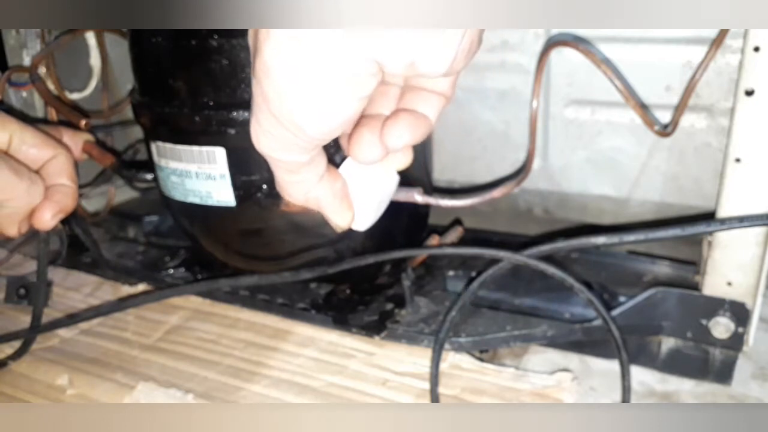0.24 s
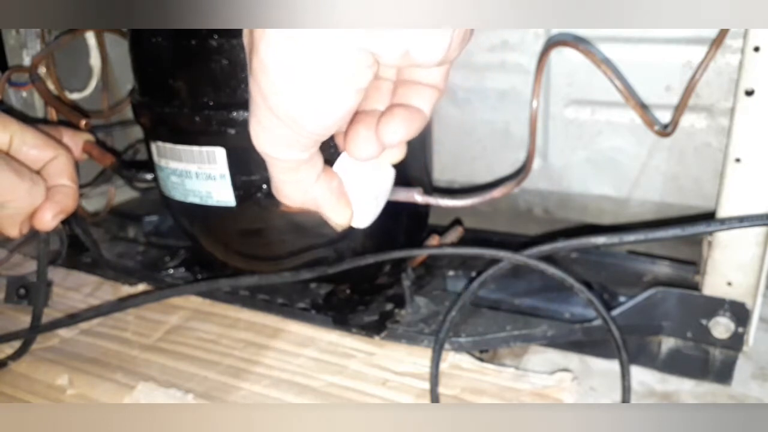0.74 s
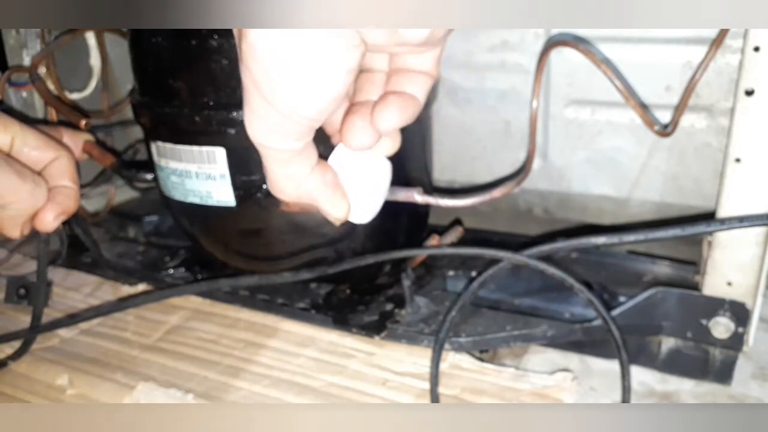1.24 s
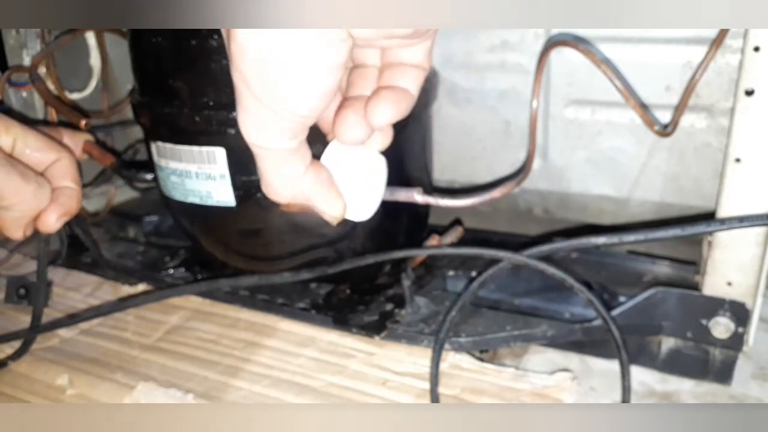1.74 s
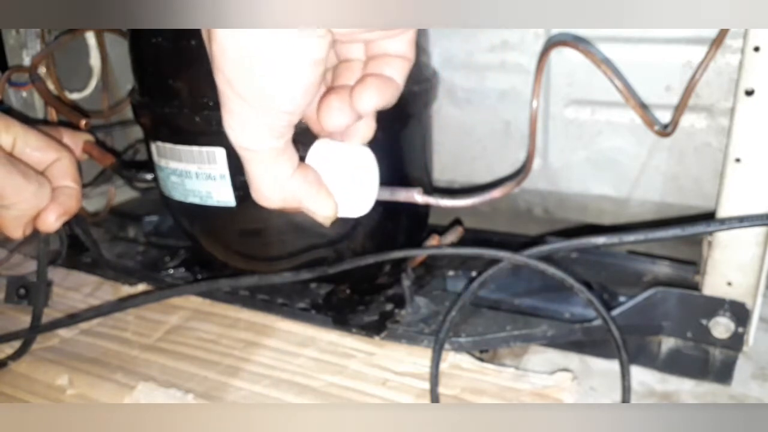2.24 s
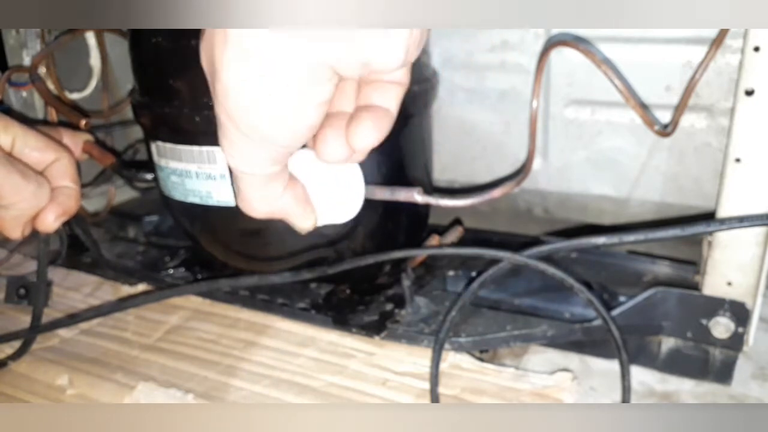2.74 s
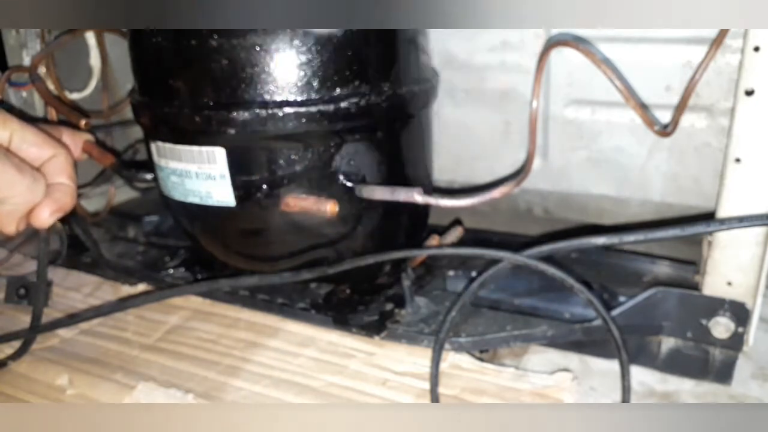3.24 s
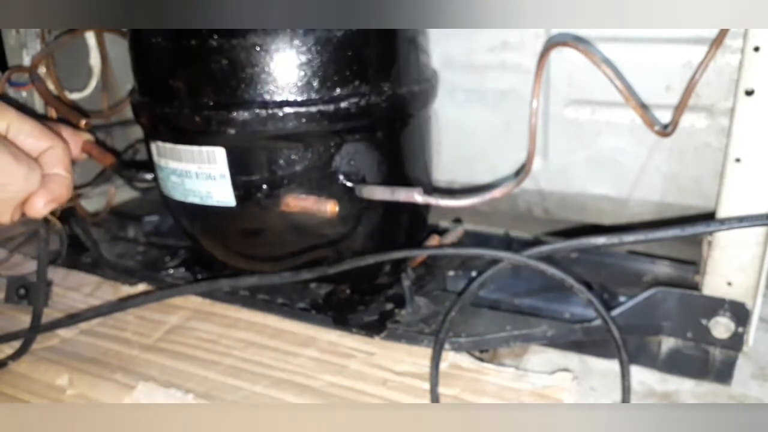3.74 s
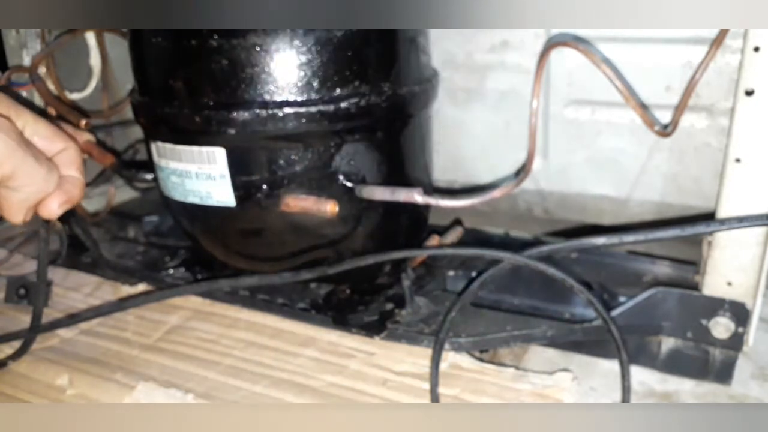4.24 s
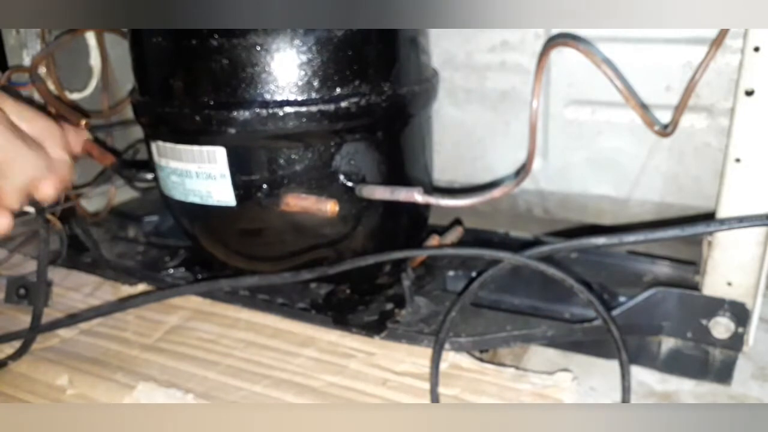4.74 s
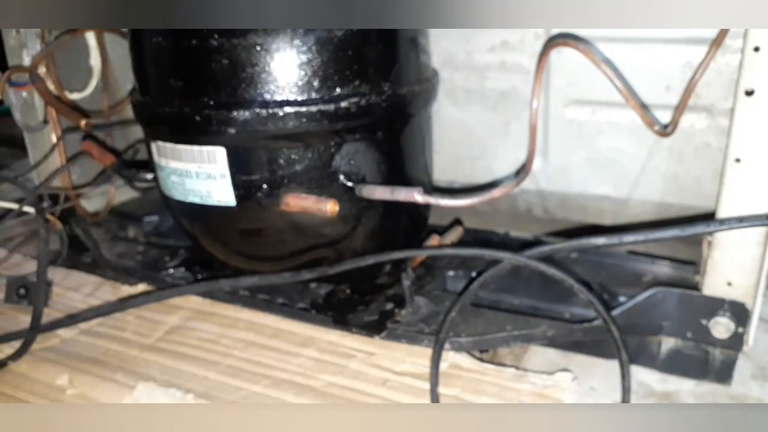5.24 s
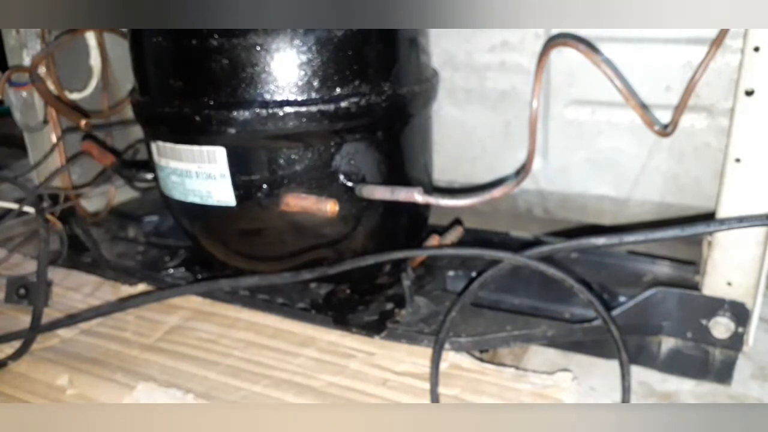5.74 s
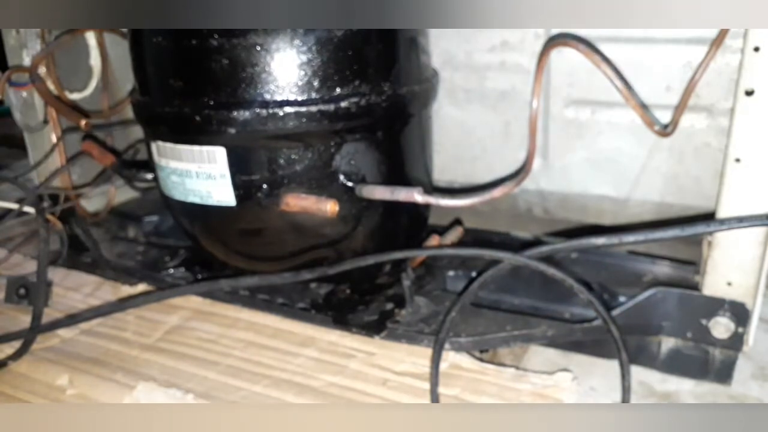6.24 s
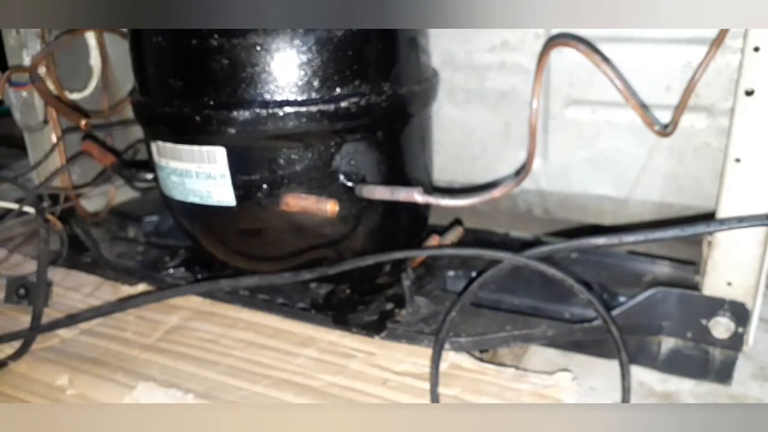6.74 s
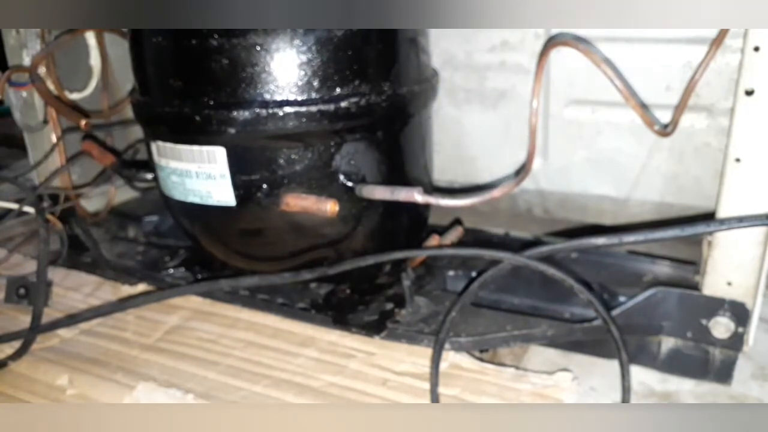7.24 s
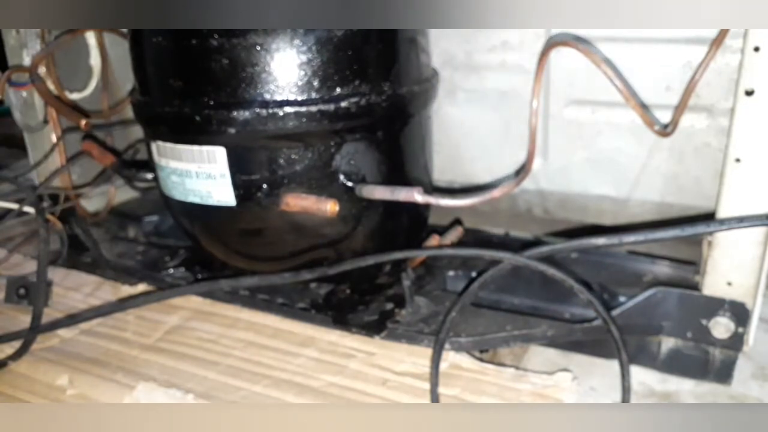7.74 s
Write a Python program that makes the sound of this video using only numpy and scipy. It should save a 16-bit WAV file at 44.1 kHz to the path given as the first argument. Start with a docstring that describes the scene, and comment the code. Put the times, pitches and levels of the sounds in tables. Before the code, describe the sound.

A refrigerator compressor runs close to the microphone with its tube open: a loud, constant bright hiss, a fast metallic valve buzz and a quieter low hum. Near three seconds a plastic cap gives tiny clicks and the hiss brightens slightly. Just before five seconds wiring rustles faintly and the hum grows fuller. A few dull bumps come near the end, over faint workshop machine drone and rumble.

```python
"""Open refrigerator compressor in a workshop

A compressor runs close by with its service tube open: turbulent air hisses through resonances of tube and
shell, a valve strikes the shell once a turn, and the motor hums as sines at multiples of the crank rate.
A hand takes a plastic cap away and another lets go of the wiring; hiss and hum come clear in two steps.
Cap, wiring and a few dull bumps near the end are pushes that ring damped modes.
Behind them other machines drone as steady tones over a noise rumble that swells now and then."""
import sys
import numpy as np
from scipy import signal
from scipy.fft import rfft, irfft, next_fast_len
from scipy.io import wavfile

SR = 44100
rng = np.random.default_rng(int(sys.argv[2]) if len(sys.argv) > 2 else 0)


def generate_wav(sig):
    """Save sig (samples, or channels by samples) to the path in sys.argv[1] as 16-bit PCM at SR."""
    pcm = np.round(np.clip(np.atleast_2d(sig).T, -1, 1) * 32767).astype(np.int16)
    wavfile.write(sys.argv[1], SR, pcm)


N = 352359
TIME = np.arange(N) / SR   # s
SIZE = next_fast_len(N)
FREQ = np.maximum(np.arange(SIZE // 2 + 1) * SR / SIZE, 1)   # Hz, kept above zero for division and logarithm

# resonances of tube and shell that colour the hiss: (frequency [Hz], nominal width [Hz], relative level [dB])
HISS_MODES = [(2296, 1610, -21.1), (2359, 242, -9.1), (2576, 756, -18.9), (3047, 809, -11.8),
              (3481, 305, -9.4), (3820, 344, -1.8), (4072, 390, -3.9), (4215, 146, -4.4), (4732, 964, -7.4),
              (5037, 313, -2.3), (5334, 583, -3.6), (5771, 464, -4.6), (6016, 233, -8.2),
              (6434, 863, -11.2), (6855, 327, -6.1), (7130, 509, -4.6), (7465, 226, -4.5),
              (7865, 916, -10.7), (8269, 361, -3.6), (8732, 752, -8.8), (9077, 314, -5.0),
              (9673, 1386, -8.9), (10638, 518, -3.3), (11053, 1034, -6.3), (11895, 769, -5.9),
              (12638, 1196, -7.4), (13443, 1800, -11.8), (14213, 287, -4.1), (14588, 668, -9.5),
              (15156, 1120, -8.5)]
# short echo paths off hands, shell and cabinet:
# (delay [ms], signed strength behind the hands [ratio], signed strength in the clear [ratio])
ECHO_PATHS = [(.276, .01, .09), (.548, -.08, .01), (.84, .05, -.09), (.994, .01, .11), (1.114, -.07, .05),
              (2.42, -.08, -.02), (2.724, .04, .12), (4.97, -.07, -.06), (5.4, -.05, -.05),
              (5.578, -.03, -.07)]
# shell modes struck by the valve: (frequency [Hz], nominal width [Hz], relative level [dB])
VALVE_MODES = [(1426, 110, -18), (2315, 108, -13), (2719, 70, -5), (2900, 70, -6), (2952, 205, -4),
               (3400, 150, -10), (3760, 200, -13), (4700, 70, -2.5), (5214, 70, 0.5), (5305, 94, 0),
               (5340, 264, 0), (5717, 300, -9), (6005, 100, 0), (6650, 250, -12), (7460, 120, -18)]
# brief fades of the shell's bright ring: (time [s], length [s], depth [dB])
RING_DIPS = [(4.6, .08, 4), (6.29, .11, 12)]
# motor hum: (multiple of the crank rate [ratio], relative level [dB])
HUM_ORDERS = [(1, -10), (2, 0.5), (3, -4), (8, -12.5)]
# hands that shield and damp the compressor, first at the cap, then at the wiring:
# (time of leaving [s], duration of the move [s], share of the shielding [0-1], damping of the hum [dB])
HANDS = [(3.22, 0.2, 1, 1), (4.77, 0.085, 0.67, 7.5)]
# the cap scuffs against the tube: (time [s], level [dB], contact [s])
CAP_CLICKS = [(2.720, -26, .00003), (2.779, -28, .00003), (2.790, -30.5, .00003), (2.924, -30, .00005)]
# modes of the cap: (frequency [Hz], relative level [dB], 60 dB decay time [s])
CAP_MODES = [(1910, -8, 0.014), (2180, -8.5, 0.014), (2570, 1, 0.0094), (3130, -7, .014)]
# the wiring rustles as it is let go: (time [s], level [dB], contact [s])
WIRE_TICKS = [(4.829, -38, .00005), (4.847, -49, .00005), (4.896, -42, .00005)]
# modes of the wiring: (frequency [Hz], relative level [dB], 60 dB decay time [s])
WIRE_MODES = [(1380, 2, 0.023), (1640, -1, .035)]
# dull bumps, the first with a hard edge and a soft rebound: (time [s], level [dB], contact [s])
BUMPS = [(7.219, -27, .00004), (7.256, -39, .0008), (7.812, -38, .0005), (7.848, -35, 0.00045),
         (7.908, -28, .0004)]
# modes of the bumped body: (frequency [Hz], relative level [dB], 60 dB decay time [s])
BUMP_MODES = [(80, -13, 0.069), (123, 0.5, 0.14), (189, 6.5, 0.044), (258, -4.5, 0.063), (344, -2, 0.023),
              (1080, -7, 0.024), (1590, -3, .022), (2020, -15, .014)]
# steady tones of the other machines: (frequency [Hz], relative level [dB])
SHOP_TONES = [(84.3, -67.5), (126.4, -62.5), (142.6, -62.5), (193, -56), (201.2, -56), (227, -61.5),
              (243.4, -53.5), (252.9, -48), (269.3, -63), (302, -81), (327, -66), (434, -62), (482.4, -76),
              (506, -66), (530.7, -71.5), (578.9, -74), (627.1, -70), (675.4, -72.5), (771.9, -73)]
# spectrum of the workshop rumble: (frequency [Hz], relative density [dB per Hz])
RUMBLE_SPECTRUM = [(25, -20), (55, -34), (80, -5.5), (120, -1), (250, -0.5), (310, -3), (360, -10.5),
                   (440, -5.5), (530, -6), (680, -14.5), (1000, -17.5), (1300, -16), (1850, -25.5),
                   (2400, -24)]
# hollow resonances of the cabinet in the rumble: (frequency [Hz], nominal width [Hz], relative level [dB])
CABINET_MODES = [(167.2, 18, 12), (1550, 350, -10.5), (1315, 120, -12.5)]
# swells of the deep rumble: (time [s], length [s], level [dB])
SURGES = [(2.95, 0.22, -47), (4.36, 0.15, -46), (6.65, 0.11, -44.5), (7.278, 0.33, -49), (7.88, 0.066, -49)]

CRANK_HZ, MAINS_HZ = 49.54, 50.0
HISS_DB = -30.5
HISS_SHIELD_DB, TREBLE_SHIELD_DB = 0.5, 1.9   # what full shielding takes off all the hiss, and off its treble
VALVE_DB = -41.5
RING_DB, RING_DB_PER_S = -0.65, 0.87   # gain of the shell's bright ring at the start, and its steady rise
HUM_DB, HUM_WAVER_DB = -51, 1.6
RUMBLE_DB = -45
TONES_DB, TONES_SHIELD_DB = -0.15, 1.5   # gain of all the tones in the clear, and what full shielding takes off
CUTOFF_HZ = 15750


def hiss(shield, flutter_db=0.45, edge_hz=8000, edge_db=1.53):
    """Turbulence is broadband noise that resonances colour; an obstacle makes it softer and duller."""
    turbulence = rng.standard_normal(N)
    air = in_room(coloured(turbulence, np.sqrt(noise_power(HISS_MODES))))
    treble = highpassed(air, 2, edge_hz)
    treble_gain = from_db(edge_db - TREBLE_SHIELD_DB * shield)
    air = air + treble * (treble_gain - 1)
    level_db = HISS_DB - HISS_SHIELD_DB * shield + flutter_db * drift(30)
    return from_db(level_db) * rms_one(reflected(air, shield))


def valve(turns, ring_db, uneven_db=0.5, jitter_turns=0.000061, ring_hz=4000):
    """Periodic impact excites shell modes: one uneven blow a turn, with a varying gain on the upper modes."""
    shut_at, contact = .125, .002   # turns
    angle = (turns + jitter_turns * drift(50)) % 1
    blows = np.exp(-((angle - shut_at) / contact) ** 2)
    blows = blows * from_db(uneven_db * drift(40))
    response = sum(from_db(db) * resonance(hz, width) for hz, width, db in VALVE_MODES)
    shell = coloured(blows, response)
    upper = highpassed(shell, 4, ring_hz)
    return shell - upper + from_db(ring_db) * upper


def motor(turns, magnetic_db=-9):
    """Rotation gives harmonics of the crank; the second beats with magnetic hum at twice the mains rate."""
    orders = sum(from_db(db) * tone(order * turns) for order, db in HUM_ORDERS)
    magnetic = from_db(magnetic_db) * tone(2 * MAINS_HZ * TIME)
    return orders + magnetic


def hands():
    """Obstruction and damping end as each hand leaves: shielding (0-1) and hum damping (dB) over time."""
    shield, damping_db = 0, 0
    for leaves_s, move_s, share, db in HANDS:
        present = np.clip(.5 - (TIME - leaves_s) / move_s, 0, 1)
        shield = shield + share * present
        damping_db = damping_db + db * present
    return np.clip(shield, 0, 1), damping_db


def cap():
    """Impact with friction: short contacts and brief scuffing ring the modes of the plastic cap."""
    return struck(CAP_CLICKS, CAP_MODES, scuff=.7, scuff_s=0.0044)


def wiring():
    """Friction outlasts impact: ticks with a longer rustle ring the modes of the wiring."""
    return struck(WIRE_TICKS, WIRE_MODES, scuff=1.2, scuff_s=0.015)


def bumps():
    """Impact without friction: mostly soft contacts ring low, damped modes."""
    return struck(BUMPS, BUMP_MODES)


def struck(hits, modes, scuff=0, scuff_s=.004):
    """Impact excitation of damped modes: a longer contact is duller, and friction noise dies after it."""
    force = np.full(N, 1e-18)   # a tiny floor keeps the filters out of denormal numbers
    age = np.arange(-SR // 100, SR // 20) / SR
    for s, db, contact_s in hits:
        push = np.exp(-(age / contact_s) ** 2)
        friction = rng.standard_normal(len(age)) * (age > 0) * np.exp(-np.abs(age) / scuff_s)
        contact = push / push.sum() + scuff * friction / np.linalg.norm(friction)
        at = round((s + age[0]) * SR)
        force[at:at + len(age)] += from_db(db) * contact
    ringing = np.zeros(N)
    for k, (hz, db, t60) in enumerate(modes):
        radius = from_db(-60 / (t60 * SR))   # decay per sample
        angle = 2 * np.pi * hz / SR
        poles = [1, -2 * radius * np.cos(angle), radius * radius]
        mode = signal.lfilter([0, np.sin(angle)], poles, force)
        ringing += from_db(db) * mode * (-1) ** k   # neighbouring modes alternate in sign
    return ringing


def workshop(shield):
    """Superposition of independent sources: drones, a cabinet-coloured rumble and its deep swells."""
    return rumble() + deep_surges() + drones(shield)


def drones(shield, waver_db=1.0, waver_turns=.05):
    """Steady rotation gives discrete tones, each wavering slightly in level and phase."""
    tones = np.zeros(N)
    for hz, db in SHOP_TONES:
        level = from_db(db + waver_db * drift(6.5))
        tones += level * tone(hz * TIME + waver_turns * drift(4))
    return from_db(TONES_DB - TONES_SHIELD_DB * shield) * tones


def rumble():
    """Powers of incoherent noise add: a broad spectrum plus the hollow resonances of the cabinet."""
    hz, db = np.transpose(RUMBLE_SPECTRUM)
    broad_power = from_db(np.interp(np.log(FREQ), np.log(hz), db)) ** 2
    power = broad_power + noise_power(CABINET_MODES)
    return from_db(RUMBLE_DB) * coloured(rng.standard_normal(N), np.sqrt(power))


def deep_surges(deep_hz=140, deep_width_hz=210):
    """Amplitude modulation of resonant noise: smooth envelopes make the deep rumble swell."""
    envelope = swells([(s, length, from_db(db)) for s, length, db in SURGES])
    return envelope * coloured(rng.standard_normal(N), resonance(deep_hz, deep_width_hz) ** 2)


def reflected(x, shield, reflect_hz=3200):
    """Small surfaces reflect only treble; interference combs it and shifts as the hands withdraw."""
    treble = rfft(x, SIZE) / (1 + (reflect_hz / FREQ) ** 10)
    out = x
    for delay_ms, shielded, clear in ECHO_PATHS:
        delay = np.exp(-2j * np.pi * FREQ * delay_ms / 1000)
        strength = clear + (shielded - clear) * shield
        out = out + strength * irfft(treble * delay, SIZE)[:N]
    return out


def in_room(x, room_db=-10, t60=0.18):
    """Diffuse reverberation: a decaying noise tail ripples the spectrum finely."""
    tail = rng.standard_normal(N) * from_db(-60 * TIME / t60) * (TIME > .005)
    tail_response = rfft(tail / np.linalg.norm(tail), SIZE)
    return coloured(x, 1 + from_db(room_db) * tail_response)


def resonance(hz, width_hz):
    """Second-power resonance: its response swells before it dies; gain 1 at the centre."""
    return 1 / (1 + 2j * (FREQ - hz) / width_hz) ** 2


def noise_power(modes):
    """Incoherent excitation: the power spectra of separately stirred resonances add."""
    return sum(from_db(db) ** 2 / (1 + (2 * (FREQ - hz) / width) ** 2) ** 4 for hz, width, db in modes)


def coloured(x, response):
    """Linear filtering: multiply the spectrum by a response, then scale to rms 1."""
    return rms_one(irfft(rfft(x, SIZE) * response, SIZE)[:N])


def highpassed(x, order, hz):
    """Zero-phase filtering: pass the treble without delay."""
    return signal.sosfiltfilt(signal.butter(order, hz, "high", fs=SR, output="sos"), x)


def tone(turns):
    """Simple harmonic motion: a sine of rms 1 with a random starting phase."""
    return np.sqrt(2) * np.sin(2 * np.pi * (turns + rng.random()))


def drift(per_s):
    """Slow random fluctuation: interpolated random knots, per_s of them a second, scaled to rms 1."""
    knots = rng.standard_normal(4000)
    return rms_one(np.interp(TIME * per_s, np.arange(len(knots)), knots))


def swells(rows):
    """Gaussian envelopes: a smooth hump for each (time [s], length [s], height)."""
    return sum(height * np.exp(-((TIME - s) / length) ** 2) for s, length, height in rows)


def from_db(db):
    """Logarithmic level: decibels to amplitude gain."""
    return 10 ** (np.asarray(db) / 20)


def rms_one(x):
    """Normalisation: scale to an rms of 1."""
    return x / np.sqrt(np.mean(x ** 2) + 1e-20)


def scene():
    """Superposition: all sources add at one microphone, alike in both channels."""
    crank_hz = CRANK_HZ + .012 * drift(6)
    turns = np.cumsum(crank_hz) / SR
    shield, damping_db = hands()
    ring_db = RING_DB + RING_DB_PER_S * TIME - swells(RING_DIPS)
    hum_db = HUM_DB - damping_db + HUM_WAVER_DB * drift(7)
    compressor = hiss(shield) + from_db(VALVE_DB) * valve(turns, ring_db) + from_db(hum_db) * motor(turns)
    mono = compressor + cap() + wiring() + bumps() + workshop(shield)
    return np.tile(mono, (2, 1))


def record(dry):
    """Band limitation: a steep elliptic low-pass cuts the top."""
    lowpass = signal.ellip(12, .1, 80, CUTOFF_HZ, fs=SR, output="sos")   # 0.1 dB ripple, 80 dB stopband
    return signal.sosfilt(lowpass, dry)


dry = scene()
out = record(dry)
generate_wav(out)
```